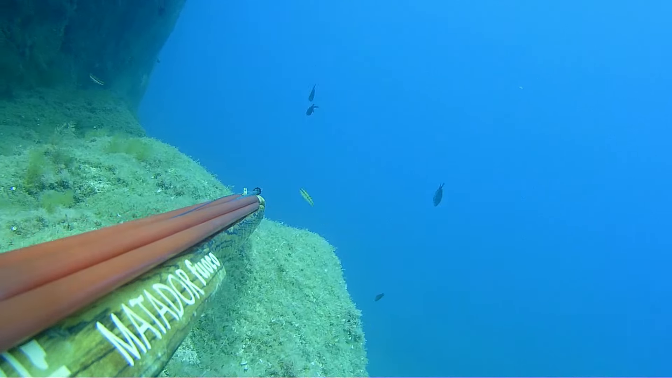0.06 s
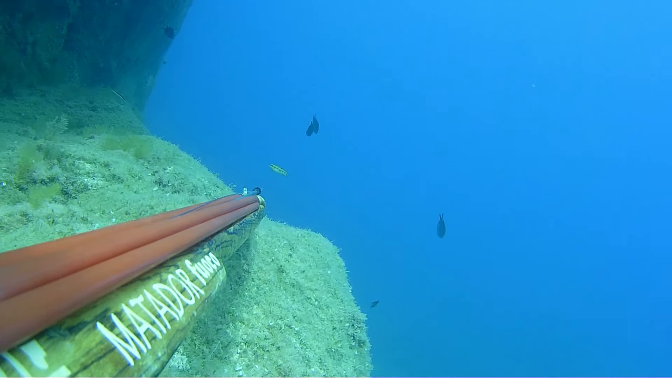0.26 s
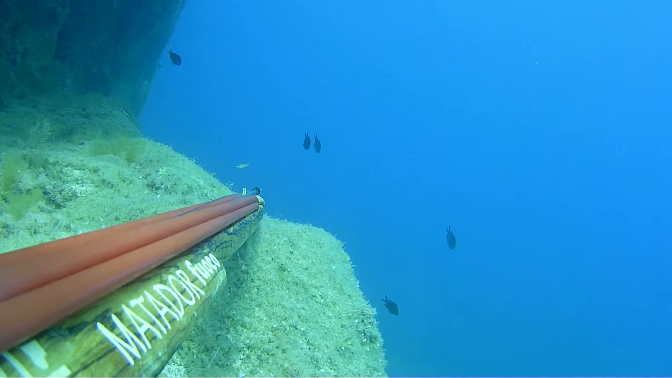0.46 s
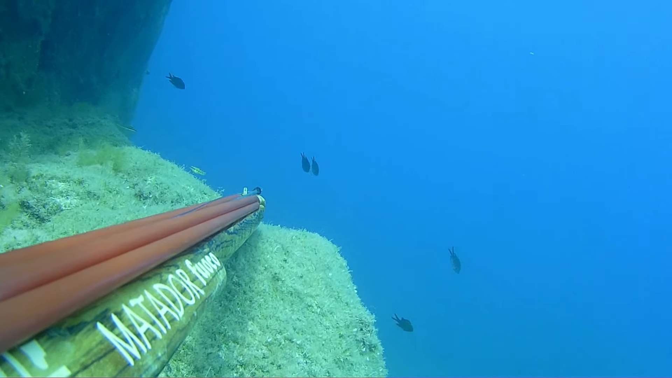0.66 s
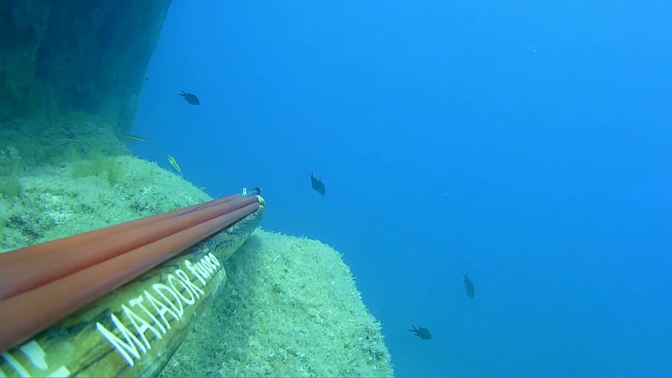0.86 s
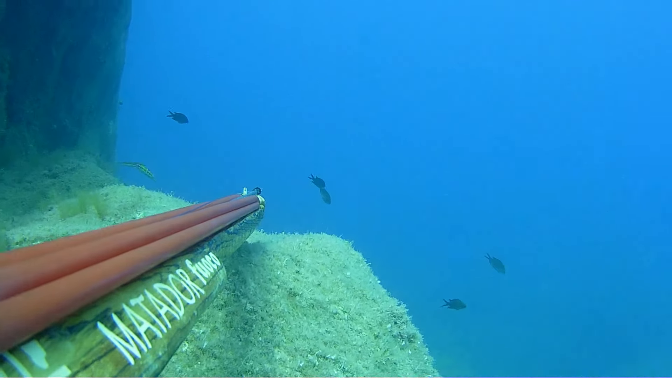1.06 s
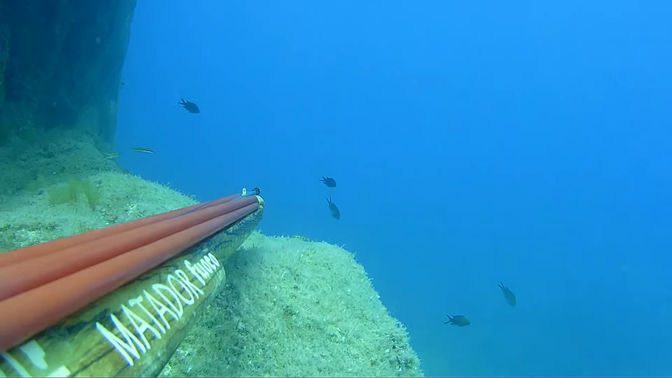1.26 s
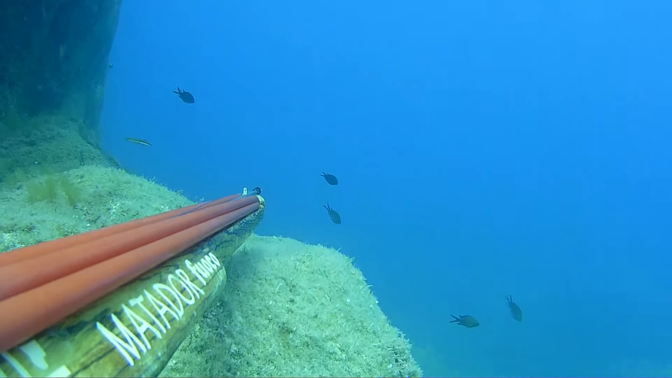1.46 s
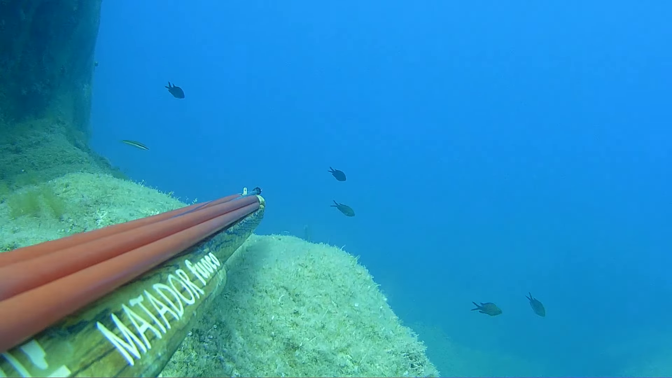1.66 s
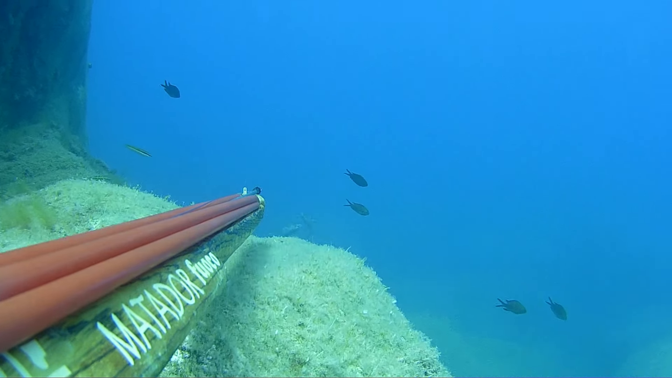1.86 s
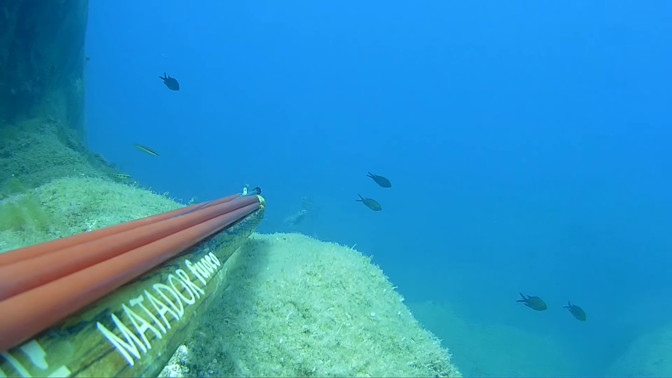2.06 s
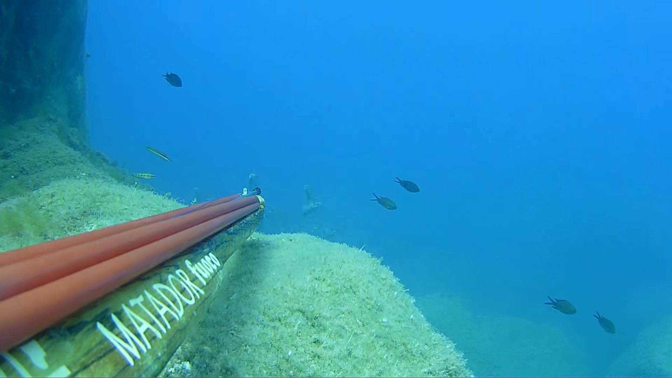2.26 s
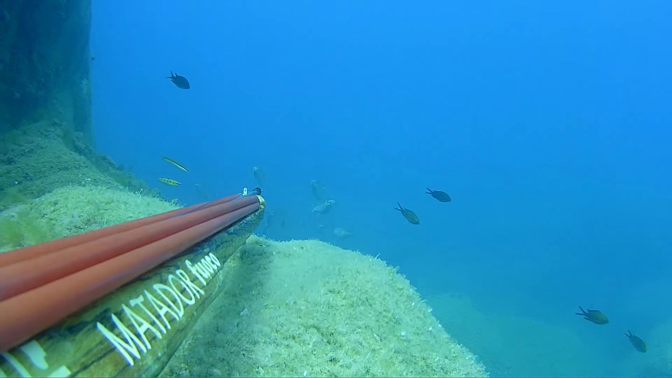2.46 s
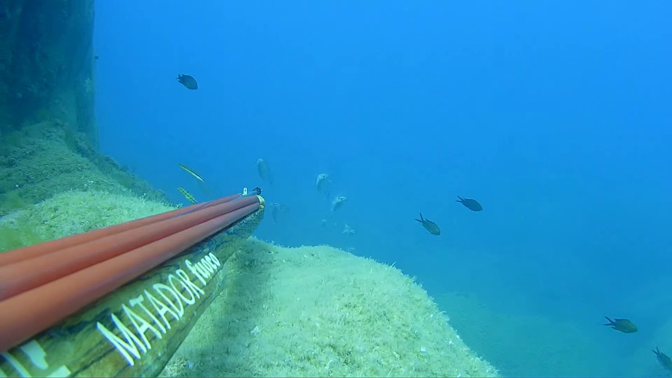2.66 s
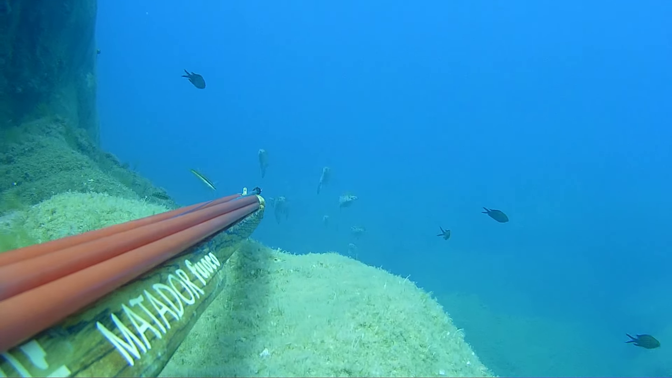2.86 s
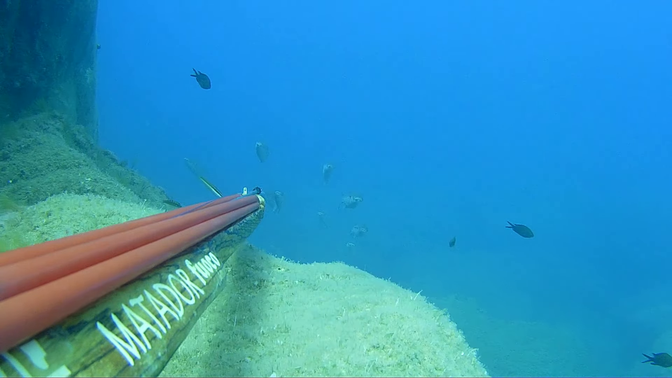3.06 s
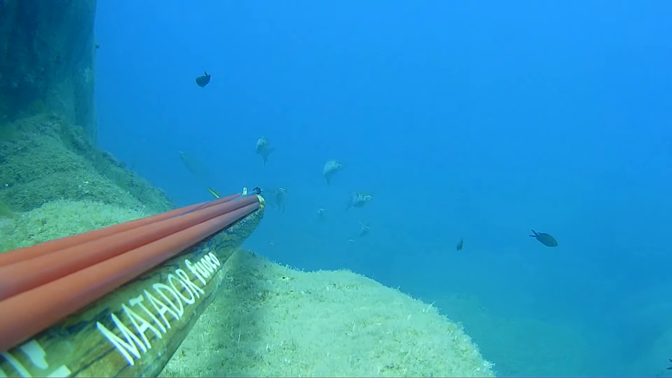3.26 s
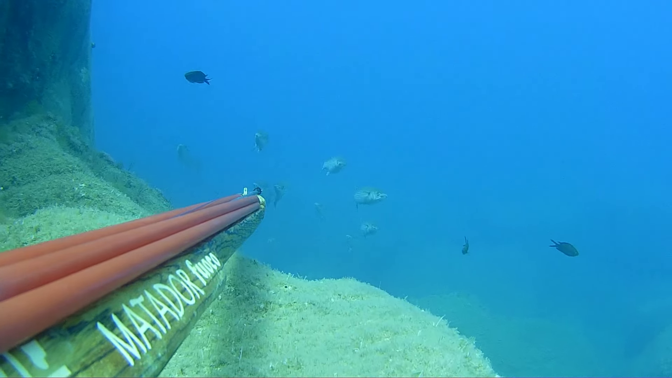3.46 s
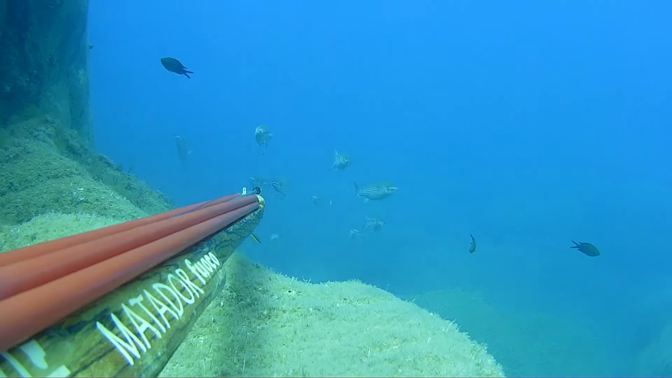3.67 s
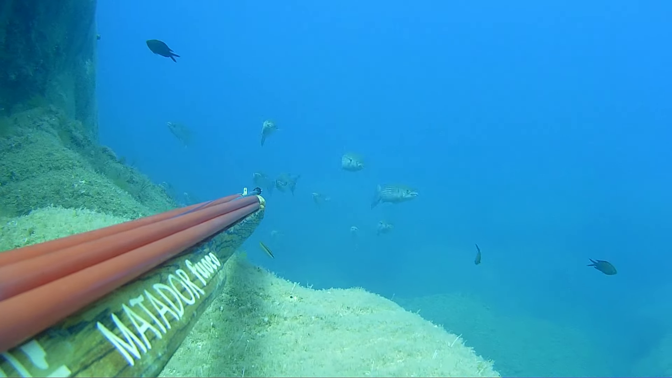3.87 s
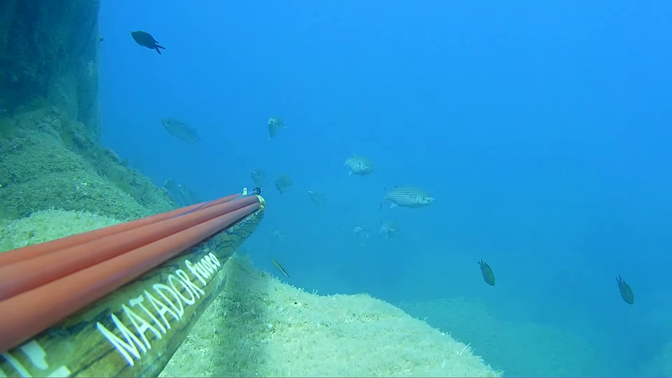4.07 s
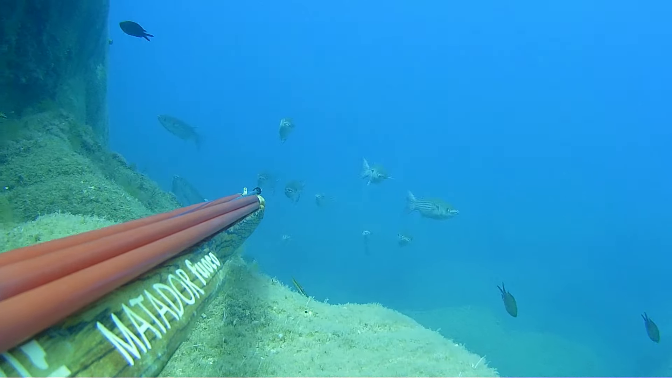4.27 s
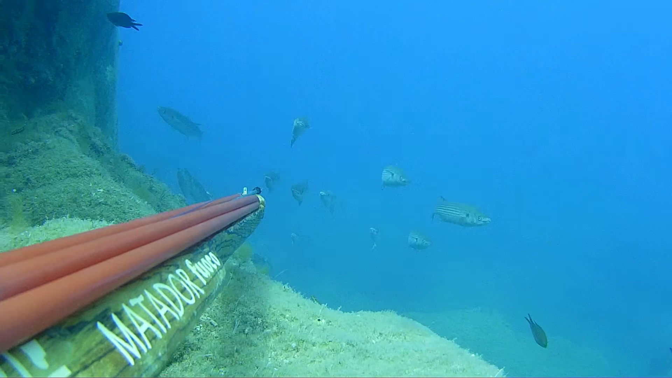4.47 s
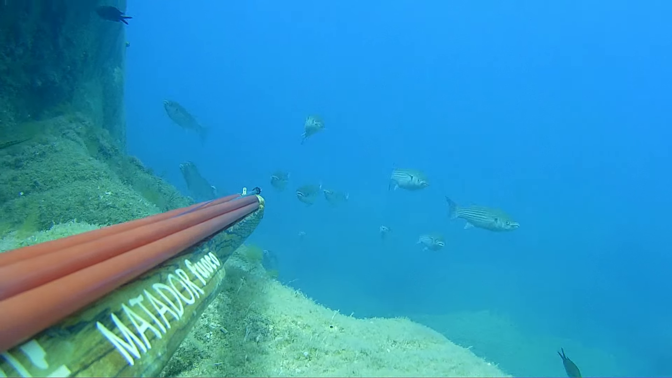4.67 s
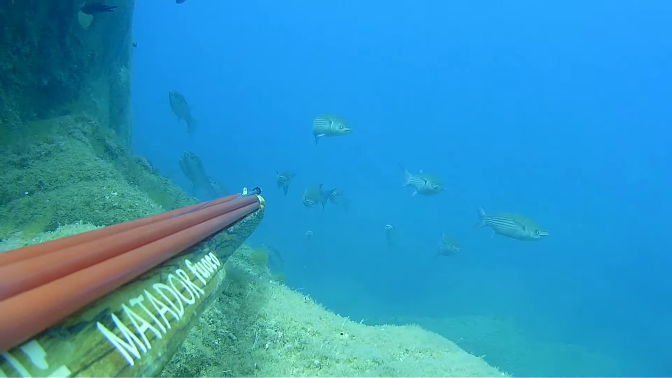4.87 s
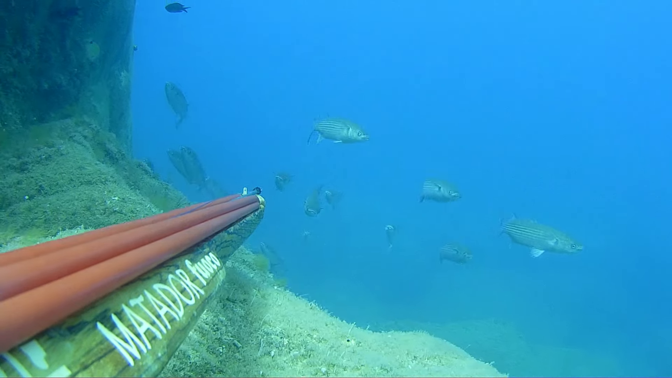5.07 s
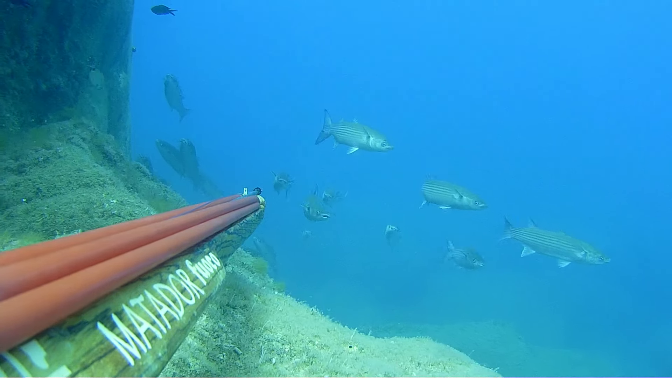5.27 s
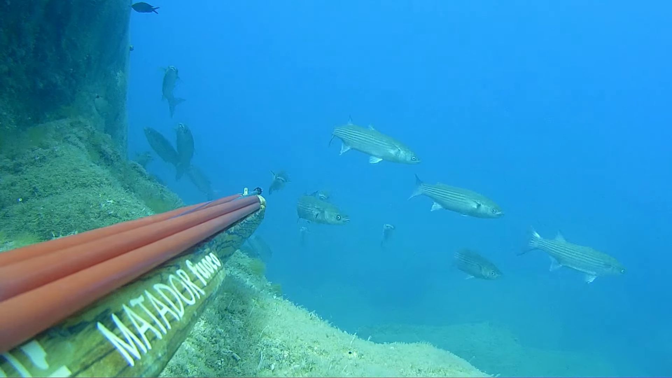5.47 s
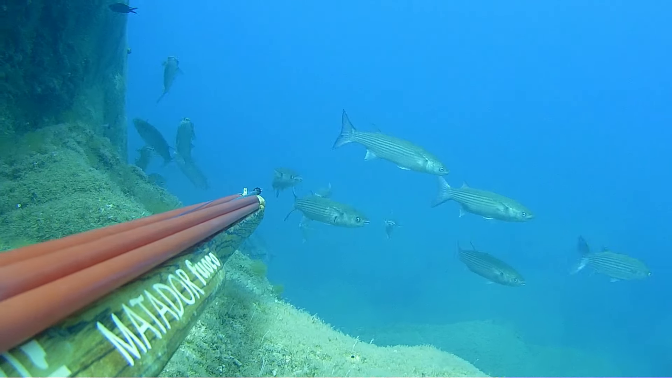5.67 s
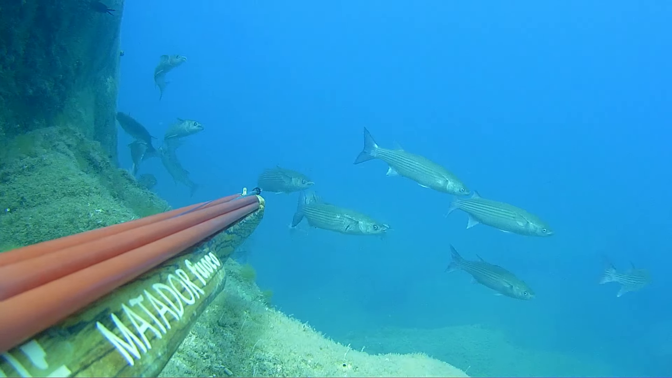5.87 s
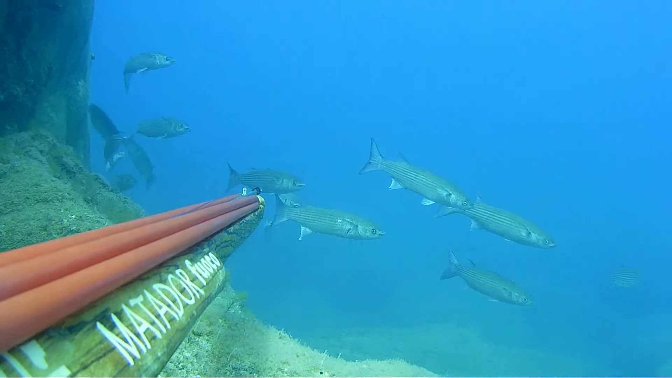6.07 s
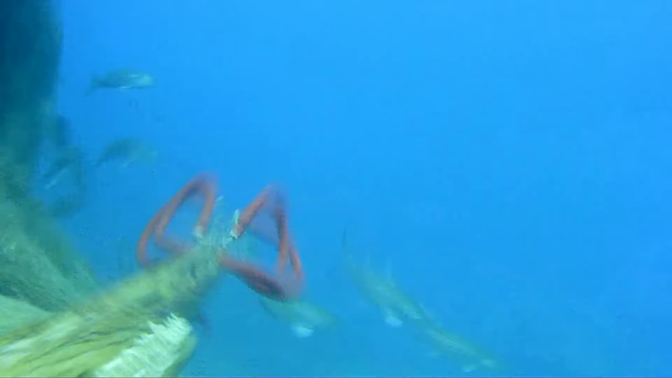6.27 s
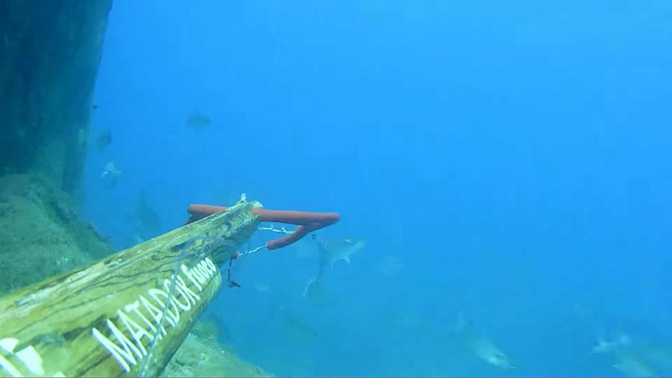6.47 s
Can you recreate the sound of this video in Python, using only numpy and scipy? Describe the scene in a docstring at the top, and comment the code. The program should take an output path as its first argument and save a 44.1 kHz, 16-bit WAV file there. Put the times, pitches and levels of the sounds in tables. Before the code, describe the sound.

The sound is close and muffled, picked up under water through a housing fixed to a speargun. A faint low wash and thin, crackly hiss run throughout, with small dry shrimp snaps at irregular moments, some dull, some bright, each briefly echoed. At about 0.46 s the hand shifts with a low bump, a knock and a short rub; softer movements follow near 0.95 s, with muted juddering at 1.23 and 1.36 s. From 1.5 to 5.5 s there is mostly clicking, denser and sharper after 2.6 s. Light ticks touch the stock at 5.53 and 5.64 s. A round, hollow trigger tock comes at 6.06 s. At 6.26 s the shot explodes: rapid band slaps, heavy low surge and rough scraping, crushed by microphone overload, with another hard crack at 6.31 s. By 6.4 s it breaks into knocks and a short metallic ring, with last slaps until about 6.5 s.

```python
"""Underwater speargun shot

Under water beside a rock, heard through a housing fixed to a band-powered speargun. Filtered noise gives
the wash of the sea; decaying noise bursts with echoes give snapping shrimp. The hand shifts and judders on
the grip in stick-slip, and decaying modes give the trigger's dull tock. The bands let go: a surge of
low-passed noise and the scraping shaft overload the microphone, and wishbone and line slap the gun."""
import sys
import numpy as np
from scipy import signal
from scipy.fft import rfft, irfft, next_fast_len
from scipy.io import wavfile

SR = 44100
rng = np.random.default_rng(int(sys.argv[2]) if len(sys.argv) > 2 else 0)


def bounce(signal):
    """Save signal as a 16-bit WAV file at the path given by the first command-line argument."""
    frames = np.transpose(np.atleast_2d(signal))
    limited = np.clip(frames, -1, 1)
    pcm = np.round(limited * 32767).astype(np.int16)
    wavfile.write(sys.argv[1], SR, pcm)


N = 287267   # length [samples]
AGE = np.arange(SR // 3) / SR   # time since the start of a short sound [s]


def from_db(db):
    """Level to amplitude: 20 dB is a factor of ten."""
    return 10 ** (np.asarray(db) / 20)


def rms_one(x):
    """Normalisation to unit effective value."""
    return x / np.sqrt(np.mean(x ** 2) + 1e-20)


def passed(x, hz, kind="low", order=2):
    """Butterworth filtering: a maximally flat passband."""
    edge_hz = np.clip(hz, 3, .45 * SR)
    sections = signal.butter(order, edge_hz, kind, fs=SR, output="sos")
    return signal.sosfilt(sections, x + 1e-18)


def add(track, s, sound):
    """Superposition: a sound is summed into the track at a given time."""
    start = int(np.clip(round(s * SR), 0, N - 1))
    track[start:start + len(sound)] += sound[:N - start]


def noise(spectrum):
    """Spectral shaping of white noise into steady noise of a given colour, rms 1."""
    hz, level_db = np.transpose(spectrum)
    size = next_fast_len(N)
    bins_hz = np.arange(size // 2 + 1) * SR / size
    gain = from_db(np.interp(np.log(bins_hz + 1), np.log(hz), level_db, left=-120, right=-120))
    white = rfft(rng.standard_normal(size))
    return rms_one(irfft(white * gain, size)[:N])


def dying(t60):
    """Exponential decay: 60 dB lost in t60 seconds."""
    return np.exp(-np.log(1000) * AGE / t60)


def ring(modes, scatter_db):
    """Modal superposition: one blow excites each mode with a random strength; peak 1."""
    out = np.zeros(len(AGE))
    for k, (hz, db, t60) in enumerate(modes):
        t = AGE[AGE < 2 * t60]
        strength = (-1) ** k * from_db(db + scatter_db * rng.normal())
        decay = np.exp(-np.log(1000) * t / t60)
        out[:len(t)] += strength * decay * np.sin(2 * np.pi * hz * t)
    return out / np.abs(out).max()


def grains(per_s, spread_db, size):
    """Random impulse process: clicks of very uneven size and either sign."""
    struck = rng.random(size) < per_s / SR
    strength = from_db(spread_db * np.minimum(rng.exponential(1, size), 4))
    return struck * strength * rng.choice([-1, 1], size)


# Spectrum of the low wash of the sea: (frequency [Hz], relative density [dB])
WATER_SPECTRUM = [(20, 10), (39, -3.5), (81, -10), (200, -10.5), (400, -12), (800, -18.5), (1500, -26),
                  (2600, -34.5), (6000, -50)]
WATER_DB = -59.5


def water():
    """Stationary broadband noise: the wash of the sea, strongest at low frequencies."""
    return from_db(WATER_DB) * noise(WATER_SPECTRUM)


def snap_power(echo_db, tail_db, lag_s, crack_t60=0.012, tail_t60=0.17):
    """Energy addition: a snap's crack and seabed scatter, repeated by the echo off the rock."""
    power = dying(crack_t60) ** 2 + (from_db(tail_db) * dying(tail_t60)) ** 2
    echo = np.interp(AGE - lag_s, AGE, power, left=0)
    return power + from_db(echo_db) ** 2 * echo


# Spectrum of shrimp crackle: (frequency [Hz], relative density [dB])
SHRIMP_SPECTRUM = [(1200, -31), (2000, -1.5), (2700, -7.5), (3300, 2), (3850, -6), (4500, 1), (5300, -0.5),
                   (6900, -5), (9100, -1.5), (11000, -8.5), (14500, -8.5), (16000, -13)]
FAR_SHRIMP_DB, HISS_DB = -75.5, -76


def far_shrimp():
    """Incoherent summation: the colony crackles further off and merges into a hiss."""
    snap = snap_power(echo_db=4, tail_db=-18.5, lag_s=0.0035)
    clicks = grains(per_s=80, spread_db=2, size=N)
    colony = np.abs(signal.oaconvolve(clicks ** 2, snap)[:N])
    power = from_db(FAR_SHRIMP_DB) ** 2 * colony / colony.mean() + from_db(HISS_DB) ** 2
    return np.sqrt(power) * noise(SHRIMP_SPECTRUM)


FAINT_SNAPS_PER_S, FAINT_SNAP_DB, FAINT_SPREAD_DB = 1.4, -58.5, 8.5   # spread is either way
FAINT_LOW_HZ, FAINT_HIGH_HZ, FAINT_TREBLE_DB = 3270, 7460, -5


def faint_snaps():
    """Random arrivals: weaker claws at random times and pitches, in rows like those of the near snaps."""
    rows = []
    for when, size, pitch in rng.random((int(FAINT_SNAPS_PER_S * N / SR), 3)):
        db = FAINT_SNAP_DB + FAINT_SPREAD_DB * (2 * size - 1)
        hz = FAINT_LOW_HZ * (FAINT_HIGH_HZ / FAINT_LOW_HZ) ** pitch
        rows.append((when * N / SR, db, hz, FAINT_TREBLE_DB))
    return rows


# Near shrimp: (time [s], crack level [dB], strongest pitch [Hz], treble re crack level [dB])
NEAR_SNAPS = [(0.3536, -56, 4540, -14), (0.4238, -51, 3220, -22), (0.852, -48, 4520, -11),
              (1.092, -53.5, 7700, -26), (1.321, -51.5, 5200, -30), (1.391, -51, 5200, -24),
              (1.4994, -47.5, 9500, -4.5), (2.0214, -52.5, 3060, -15), (2.1818, -49, 4180, -35),
              (2.3545, -51, 4350, -39), (2.466, -56, 4300, -28), (2.6638, -46, 5550, -13),
              (2.718, -41, 4560, -12), (2.896, -44.5, 4270, -23), (3.044, -53.5, 9490, -1),
              (3.1656, -52, 3250, -29), (3.4214, -42.5, 7940, -6), (4.03, -53, 4130, -29),
              (4.067, -50.5, 4500, -31), (4.149, -43, 5260, -16), (4.1706, -50.5, 4370, -3),
              (4.3309, -53, 9500, 3), (4.597, -47.5, 9200, -2), (4.776, -50.5, 5200, -29),
              (4.8814, -49, 8900, -2), (4.95, -48.5, 5500, -10), (5.0961, -42.5, 4670, -27),
              (5.1896, -48.5, 4200, -22), (5.598, -44.5, 8800, -25), (5.728, -42.5, 3200, -21)]
SNAP_ECHO_DB, SNAP_SCATTER_DB = -3, -14.5   # echo off the rock, seabed scatter
TREBLE_ECHO_DB, TREBLE_SCATTER_DB, TREBLE_T60_S = -7, -26, 0.007   # treble dies sooner and echoes less
# the claw's own pitch grows more slowly than its crack
SNAP_RING_DB, SNAP_MID_DB, RING_FOLLOWS = -55.5, -48, .85


def near_shrimp(body_db=-6, split_hz=10000, width=0.03):
    """Impulsive sources with reflection: single claws snap close by, each with its pitch and brightness."""
    out, colour = np.zeros(N), noise(SHRIMP_SPECTRUM)
    body = passed(colour, split_hz, order=4)
    treble = rms_one(passed(colour, split_hz, "high", order=4))
    for s, db, hz, bright_db in list(NEAR_SNAPS) + faint_snaps():
        start = rng.integers(N - len(AGE))
        part = slice(start, start + len(AGE))
        lag_s = rng.uniform(.004, .006)
        treble_power = snap_power(TREBLE_ECHO_DB, TREBLE_SCATTER_DB, lag_s, TREBLE_T60_S)
        sparkle = from_db(db + bright_db) * np.sqrt(treble_power) * treble[part]
        band_hz = hz * np.exp([-width, width])
        pitched = rms_one(passed(rng.standard_normal(len(AGE)), band_hz, "band", order=1))
        ring_db = SNAP_RING_DB + RING_FOLLOWS * (db - SNAP_MID_DB)
        envelope = np.sqrt(snap_power(SNAP_ECHO_DB, SNAP_SCATTER_DB, lag_s))
        crack = from_db(db + body_db) * body[part]
        add(out, s, envelope * (crack + from_db(ring_db) * pitched) + sparkle)
    return out


def surge(top_hz):
    """Envelope normalisation: water pressure swings at random but with even strength; rms 1."""
    swing = passed(rng.standard_normal(2 * len(AGE)), top_hz, order=4)
    swell = signal.hilbert(passed(swing, top_hz / 4, "high"))
    even = passed(swell.real / np.abs(swell), 2 * top_hz, order=4)
    return rms_one(even[len(AGE) // 2:][:len(AGE)])   # skips the filters' onset


def push(length, rise_s=0.0019, fall_s=0.005):
    """Exponential relaxation: the force of one movement attacks, holds and releases."""
    attack = 1 - np.exp(-AGE / rise_s)
    return attack * np.exp(-np.clip((AGE - length) / fall_s, 0, 50))


# Pushes of water, a jolt as the hand shifts, then gentle sways of the gun:
# (start [s], length [s], surge level [dB], surge bandwidth [Hz])
PUSHES = [(0.462, 0.016, -34.5, 94.6), (0.521, 0.1, -46.5, 41.3), (1.134, 0.097, -48, 32)]


def water_pushes():
    """Flow pressure: pushes of water, brief or slow, from a jolt of the hand and gentle sways of the gun."""
    out = np.zeros(N)
    for s, length, db, hz in PUSHES:
        add(out, s, from_db(db) * push(length, rise_s=0.0024, fall_s=0.045) * surge(hz))
    return out


# Ring of stock and housing: (frequency [Hz], relative level [dB], t60 [s])
BODY_MODES = [(347, -9.5, 0.018), (467, -4.5, 0.019), (582, 1, 0.026), (677.5, 0.5, 0.02),
              (971, -4.5, 0.017), (1244, -5, 0.0098), (1645, -7, 0.026), (1916, -6.5, 0.018),
              (2076, -2.5, 0.0049), (2780, -9.5, 0.0027), (3010, -3, 0.0061), (3630, -9, 0.016),
              (4500, -12, 0.0073), (5780, -14, 0.013), (6600, -13.5, 0.0075), (10200, 2.5, 0.00086)]
# Flexing of the whole gun: (frequency [Hz], relative level [dB], t60 [s])
FLEX_MODES = [(49.4, -1, 0.15), (68.7, -8, 0.255), (100, -4.5, 0.042), (140, 0.5, 0.033), (243, -8, 0.065)]


def blow(db, contact_hz, thud_db, crack_db=-13, crack_t60=0.01):
    """Impact excitation: a blow cracks, rings the stock and flexes the gun; soft contact favours low modes."""
    crack = from_db(crack_db) * dying(crack_t60) * rng.standard_normal(len(AGE))
    hit = passed(ring(BODY_MODES, scatter_db=3.5) + crack, contact_hz, order=3)
    thud = from_db(thud_db) * passed(ring(FLEX_MODES, scatter_db=3.0), 226)
    return from_db(db) * (hit / np.abs(hit).max() + thud)


def friction(top_hz, grit_db=-9):
    """Micro-slip excitation: tiny slips are heard through the ringing stock and as raw grit; rms 1."""
    slips = grains(per_s=4000, spread_db=-2.0, size=len(AGE))
    rung = signal.fftconvolve(slips, ring(BODY_MODES, scatter_db=6.0))[:len(AGE)]
    return rms_one(passed(rms_one(rung) + from_db(grit_db) * rms_one(slips), top_hz, order=1))


# The hand shifts: (start [s], length [s], surge level [dB], surge bandwidth [Hz],
# friction level [dB], judder level [dB])
HAND_SHIFTS = [(0.459, 0.055, -46.5, 187, -51.5, -61), (0.953, 0.079, -54.5, 123, -67.5, -66),
               (1.228, 0.069, -48.5, 185, -59.5, -45.5), (1.355, 0.098, -50.5, 189, -63.5, -43)]
SLIP_GAP_S, SLIP_SLOWING_S = .0195, .0028   # each wait is longer than the last
SLIP_CONTACT_HZ, SLIP_SOFTENING, SLIP_THUD_DB = 1100, 0.66, -8   # each slip is duller than the last
GRIP_FRICTION_HZ = 1590


def grip(count=4):
    """Stick-slip: the sliding hand pushes water on the housing, rubs on the stock and judders to a halt."""
    out = np.zeros(N)
    for s, length, surge_db, surge_hz, friction_db, judder_db in HAND_SHIFTS:
        pressed = from_db(surge_db) * surge(surge_hz)
        rubbed = from_db(friction_db) * friction(GRIP_FRICTION_HZ)
        add(out, s, push(length) * (pressed + rubbed))
        age = 0
        for k in range(count):
            age += SLIP_GAP_S + k * SLIP_SLOWING_S
            slip = blow(judder_db, SLIP_CONTACT_HZ * SLIP_SOFTENING ** k, SLIP_THUD_DB)
            if age < length:
                add(out, s + age, slip)
    return out


# Hollow tock of the trigger: (frequency [Hz], relative level [dB], t60 [s])
TOCK_MODES = [(133, -16.5, 0.24), (434, -3.5, 0.046), (592, -1, 0.029), (865, -0.5, 0.012)]
TRIGGER_S, TRIGGER_DB = 6.0555, -31   # release time, peak level


def trigger(contact_hz=700):
    """Damped modal response: the trigger gives way under the finger with a round tock."""
    out = np.zeros(N)
    tock = passed(ring(TOCK_MODES, scatter_db=1.5), contact_hz, order=4)
    add(out, TRIGGER_S, from_db(TRIGGER_DB) * tock / np.abs(tock).max())
    return out


# Knocks on the stock: (time [s], edge level [dB], edge bandwidth [Hz], dull weight level [dB])
STOCK_KNOCKS = [(0.4757, -32.5, 9000, -30.5), (0.4935, -42, 2400, -47), (0.506, -50, 3000, -46),
                (5.531, -37, 9800, -62), (5.6368, -43.5, 3500, -60), (6.285, -25.5, 8000, -40),
                (6.306, 13.5, 9500, -15), (6.324, 0.5, 8900, -9), (6.346, -15, 4530, -15),
                (6.3716, -27, 7000, -20), (6.379, -37, 6000, -24), (6.3893, -17, 2480, -23),
                (6.4046, -11, 6500, -9.5), (6.4463, -27, 5000, -35.5), (6.467, -27.5, 5870, -20.5),
                (6.4967, -17.5, 14700, -16)]
SETTLE_S, WEIGHT_HZ, KNOCK_THUD_DB = 0.002213, 1300, -16.5   # delay, bandwidth and low thud of the dull blow


def knocks(edge_thud_db=-42):
    """Two-stage impact: hand, bands, shaft, wishbone and line knock the stock, an edge then a dull blow."""
    out = np.zeros(N)
    for s, edge_db, edge_hz, weight_db in STOCK_KNOCKS:
        add(out, s, blow(edge_db, edge_hz, edge_thud_db))
        add(out, s + SETTLE_S, blow(weight_db, WEIGHT_HZ, KNOCK_THUD_DB))
    return out


# Steel shaft and wishbone: (frequency [Hz], relative level [dB], t60 [s])
STEEL_MODES = [(2700, -9, 0.066), (2980, -7, 0.047), (3400, 7, 0.093), (3750, -9, 0.055), (4520, 21, 0.27),
               (4550, -1, 0.098), (4830, 6, 0.26), (5370, 14, 0.23), (6930, 14, 0.23)]
STEEL_S, STEEL_DB = 6.405, -32.5
STEEL_FREE_S = .022   # rings freely this long before the bands damp it


def steel(choke_t60=0.085):
    """Added damping: the wishbone, stopped at the muzzle, sings until the slack bands smother it."""
    out = np.zeros(N)
    choke = np.interp(AGE - STEEL_FREE_S, AGE, dying(choke_t60))
    add(out, STEEL_S, from_db(STEEL_DB) * choke * ring(STEEL_MODES, scatter_db=2))
    return out


FIRE_S, BAND_SLAP_DB, BAND_SLAP_HZ, BAND_THUD_DB = 6.2572, 3, 9300, -10.5
BAND_GAP_S, BAND_LOSS_DB = .006, 2.5   # between one slap and the next


def band_slaps(count=4):
    """Repeated impact with loss: the freed bands whip along the stock, each slap weaker than the last."""
    out = np.zeros(N)
    for k in range(count):
        slap = blow(BAND_SLAP_DB - k * BAND_LOSS_DB, BAND_SLAP_HZ, BAND_THUD_DB)
        add(out, FIRE_S + k * BAND_GAP_S, slap)
    return out


# The shot, from the bands' pull through the shaft's run to the line paying out:
# (time [s], water surge level [dB], surge bandwidth [Hz], scraping level [dB])
SHOT_COURSE = [(6.2, -54, 22.3, -86), (6.253, -47, 29.84, -75), (6.256, -7, 148.3, -25),
               (6.278, -7, 147.5, -24), (6.283, -34, 120.8, -41), (6.292, -26, 129, -32),
               (6.295, -5.5, 178.1, -12), (6.326, -7, 164.9, -15.5), (6.335, -18, 109.4, -26.5),
               (6.356, -13.5, 40, -23.5), (6.369, 6, 25, -29), (6.374, -26.5, 102.2, -31),
               (6.41, -28, 119.4, -26), (6.442, -38.5, 81.6, -49.5), (6.467, -23.5, 117, -38.5),
               (6.487, -38, 54, -56)]
SCRAPE_DULL_HZ, SCRAPE_BRIGHT_HZ, SCRAPE_BRIGHTENING = 1410, 6800, 0.88   # harder scraping is brighter
SCRAPE_GRIT_DB = -4.5


def rush():
    """Flow pressure and sliding friction: bands and shaft throw water while shaft and line scrape the stock."""
    out = np.zeros(N)
    s, *columns = np.transpose(SHOT_COURSE)
    surge_db, surge_hz, scrape_db = [np.interp(s[0] + AGE, s, c) for c in columns]
    top_hz = surge_hz.max()
    warped_s = np.cumsum(surge_hz / top_hz) / SR   # swings slower as the bandwidth falls
    swing = np.interp(warped_s, AGE, surge(top_hz))
    hard = from_db(SCRAPE_BRIGHTENING * (scrape_db - scrape_db.max()))
    dull = np.sqrt(1 - hard ** 2) * friction(SCRAPE_DULL_HZ, SCRAPE_GRIT_DB)
    bright = hard * friction(SCRAPE_BRIGHT_HZ, SCRAPE_GRIT_DB)
    add(out, s[0], from_db(surge_db) * swing + from_db(scrape_db) * (dull + bright))
    return out


def scene():
    """Linear superposition: gun and shrimp over the low wash of the sea."""
    sea = water() + far_shrimp() + near_shrimp()
    gun = water_pushes() + grip() + trigger() + knocks() + steel() + band_slaps() + rush()
    return (sea + gun)[None]


OVERLOAD = 0.14   # amplitude of the flat tops before the filters
CUTOFF_HZ = 16200


def record(dry, hardness=6, leak_hz=2.2, through_db=-21, through_hz=900):
    """Saturation: the microphone overloads into slowly sagging flat tops with a little treble; the top is cut."""
    clipped = dry / (1 + np.abs(dry / OVERLOAD) ** hardness) ** (1 / hardness)
    treble = OVERLOAD * np.tanh(passed(dry, through_hz, "high") / OVERLOAD)
    sagging = passed(clipped + from_db(through_db) * treble, leak_hz, "high", order=1)
    return signal.sosfilt(signal.ellip(10, .1, 80, CUTOFF_HZ, fs=SR, output="sos"), sagging)


dry = scene()
out = record(dry)
bounce(out)
```